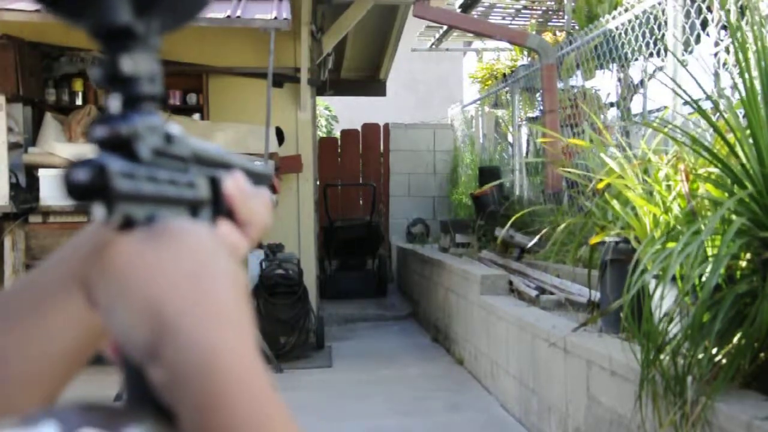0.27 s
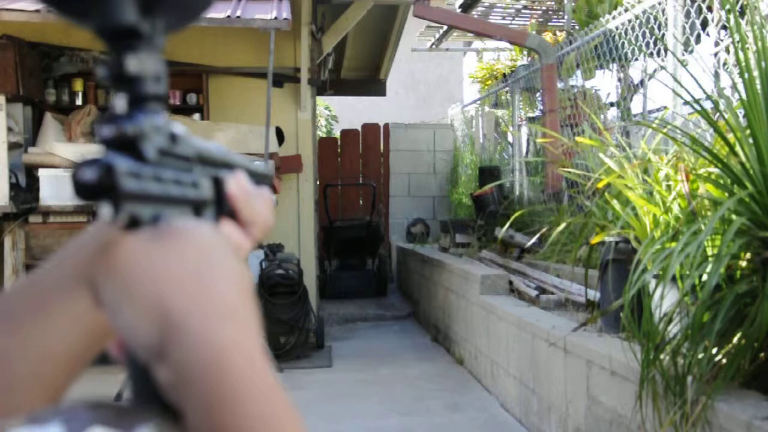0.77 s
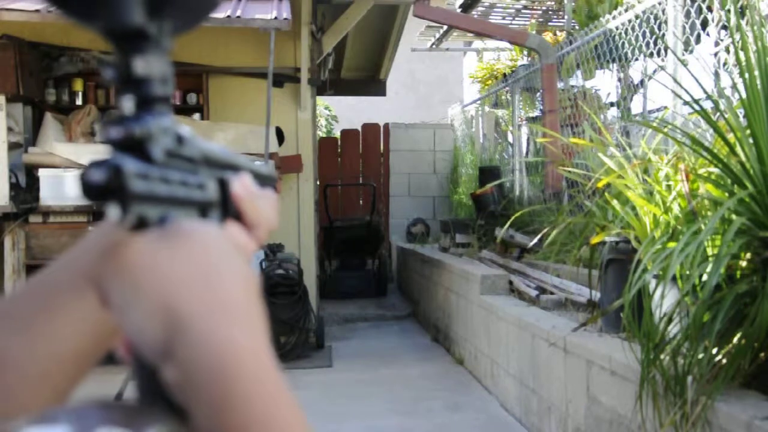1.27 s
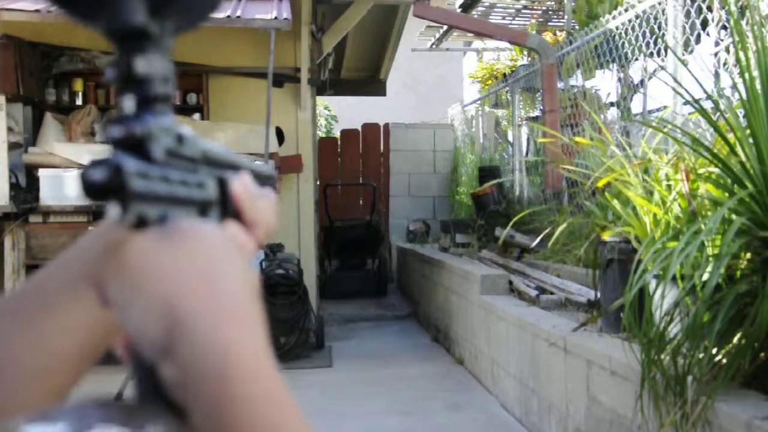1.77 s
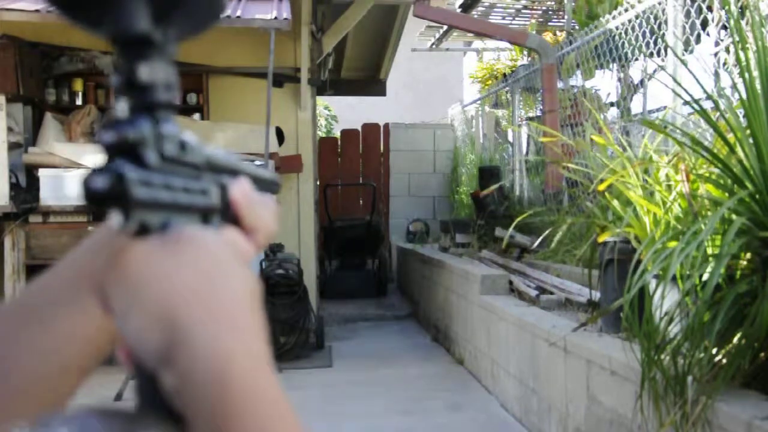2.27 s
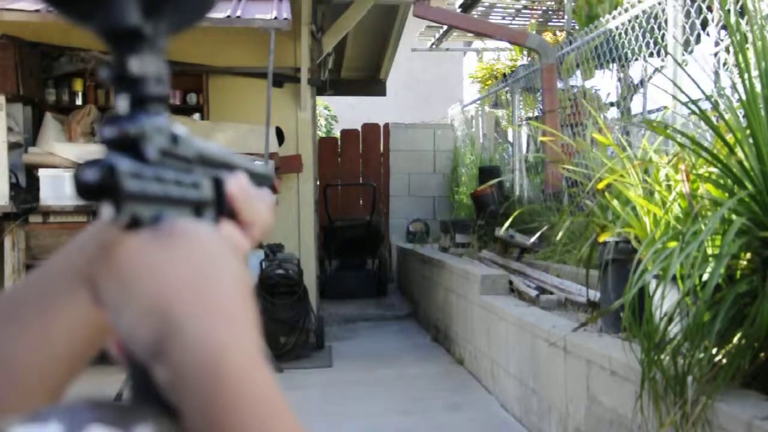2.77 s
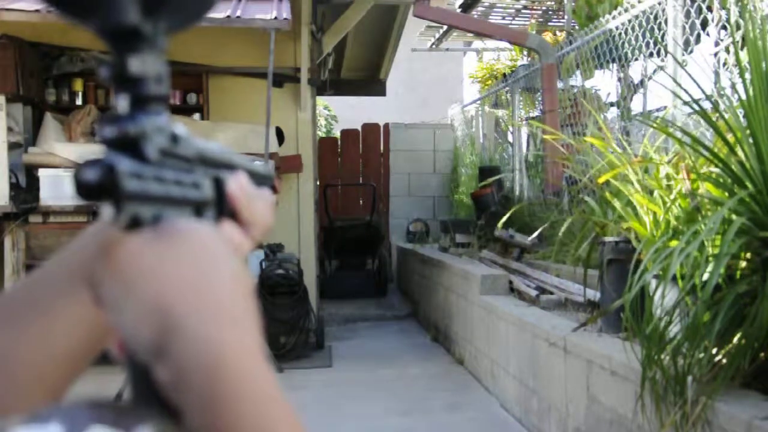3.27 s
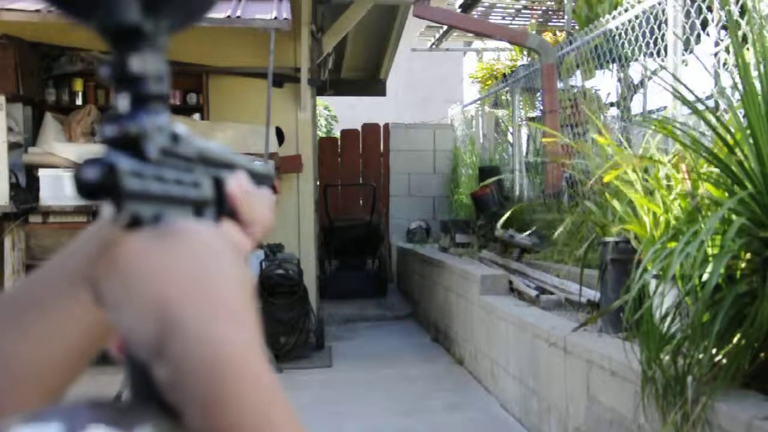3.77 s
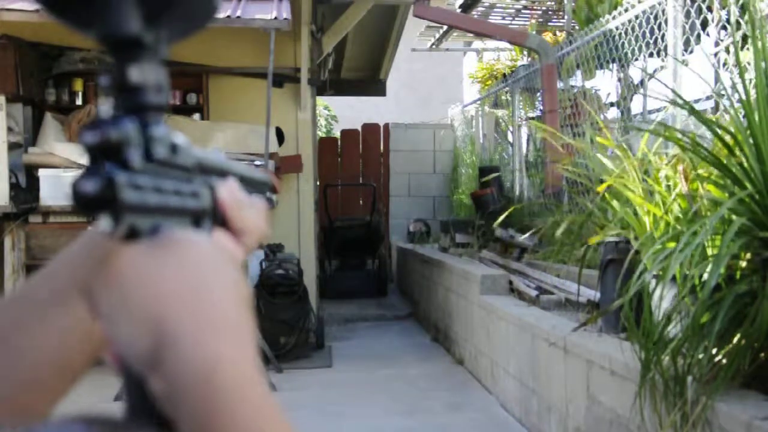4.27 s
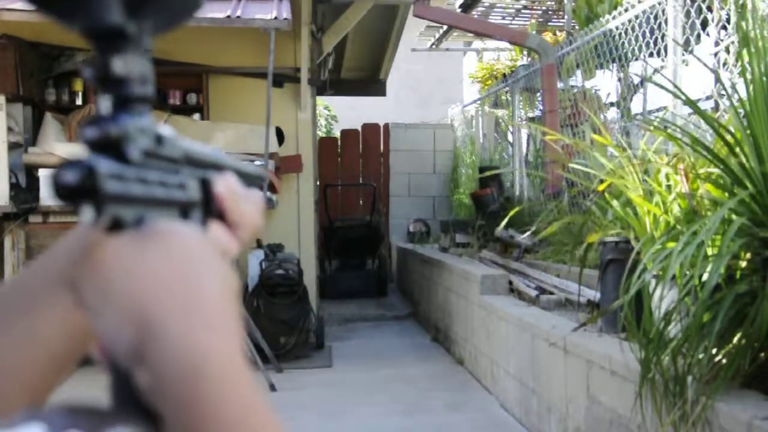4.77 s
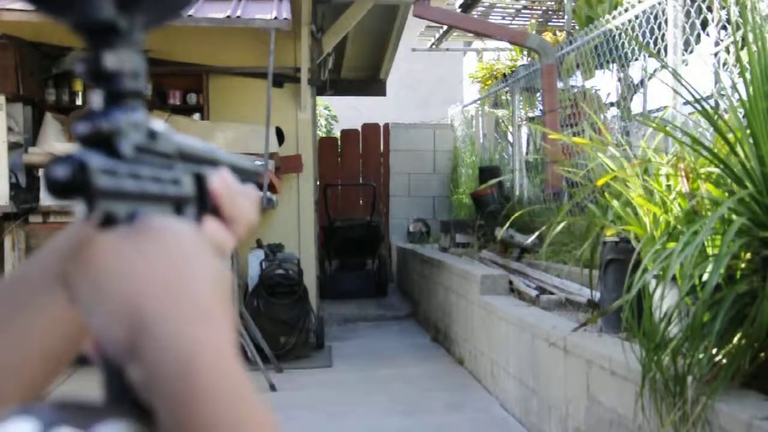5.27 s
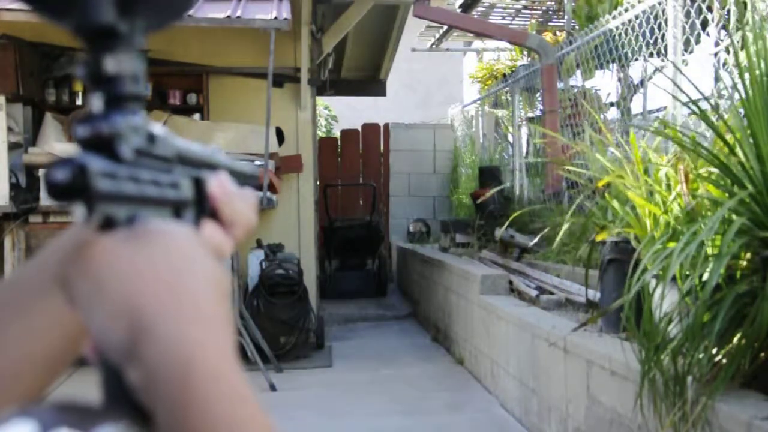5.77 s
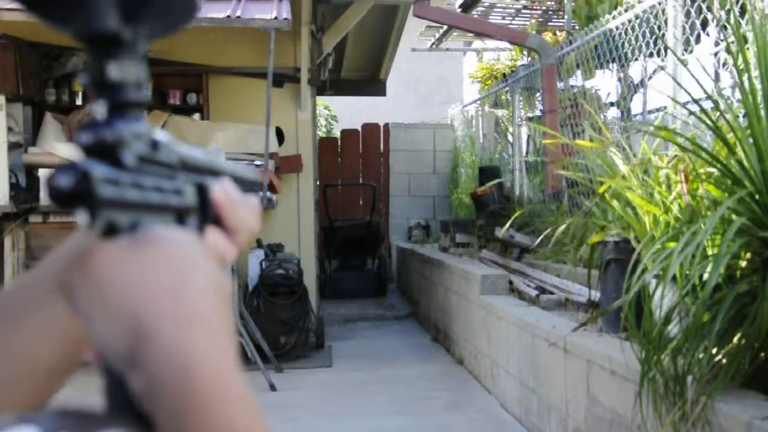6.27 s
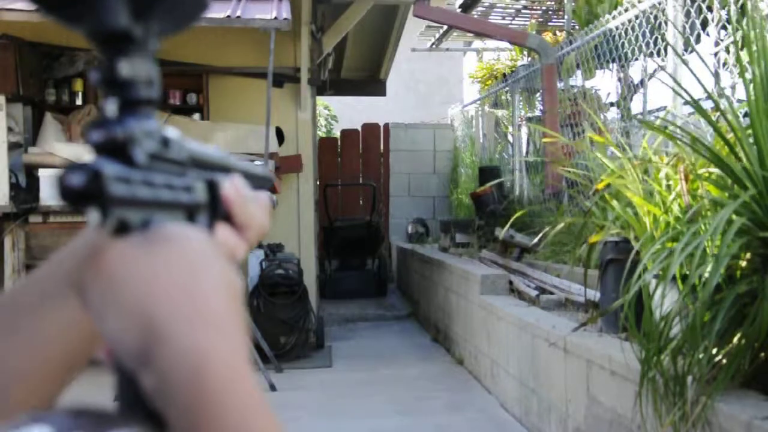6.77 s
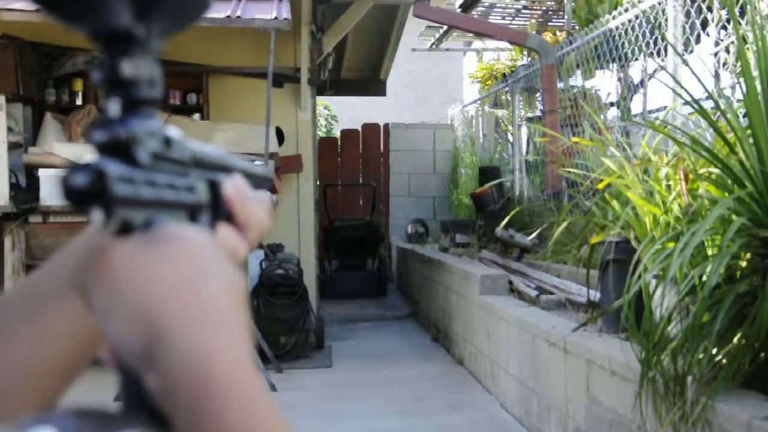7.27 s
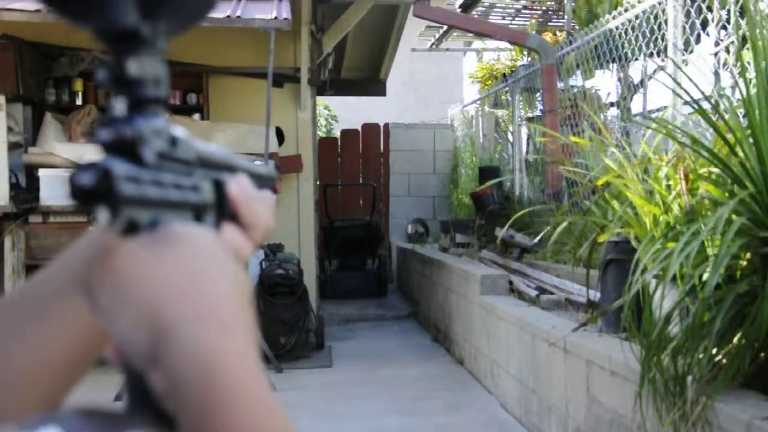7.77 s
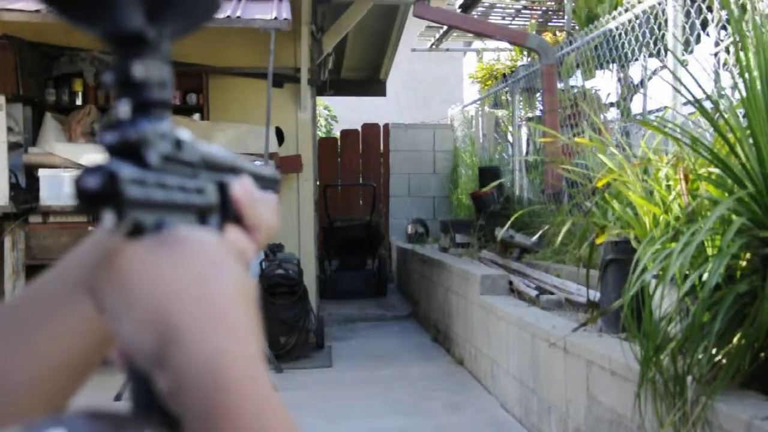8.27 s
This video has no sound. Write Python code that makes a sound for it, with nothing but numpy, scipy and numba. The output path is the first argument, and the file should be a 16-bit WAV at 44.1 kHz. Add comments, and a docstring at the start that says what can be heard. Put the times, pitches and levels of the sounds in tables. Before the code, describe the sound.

A pump paintball gun fires four sharp air blasts right beside the microphone, about two seconds apart, in a narrow walled yard. Each ball smacks a target a split second later, and the walls give a short echo. Between shots the pump clacks back and forward. Wind thumps and rumbles on the microphone throughout, over distant traffic and a few faint chirps. The shots distort slightly.

```python
"""A narrow walled back yard: a pump paintball marker fires four air blasts beside the microphone.
Each ball smacks a target at the far end about 113 ms later; the pump then clacks back and forward.
The walls echo. Wind eddies buffet the microphone throughout, over distant traffic and faint chirps.
The channel is dull, a limiter ducks after hard hits, and the shots overload the input."""
import sys
import numpy as np
from scipy import signal
from scipy.fft import rfft, irfft, next_fast_len
from scipy.io import wavfile
from numba import njit

SR = 44100
rng = np.random.default_rng(int(sys.argv[2]) if len(sys.argv) > 2 else 0)


def int16_out(signal):
    """Quantize to a 16-bit WAV file."""
    q = np.round(np.clip(np.atleast_2d(signal).T, -1, 1) * 32767)
    wavfile.write(sys.argv[1], SR, q.astype(np.int16))


N = 376173
T = np.arange(N) / SR
AGE = T[:SR * 3 // 4]  # time since an event's onset [s]


def undb(db):
    """Decibels to gain."""
    return 10 ** (np.asarray(db) / 20)


def unit(x):
    """Scale to rms 1."""
    return x / np.sqrt(np.mean(x ** 2))


def at_hz(table, hz, column=1):
    """Interpolate a table column over log frequency."""
    table = np.array(table, float)
    return np.interp(np.log(hz + 1e-9), np.log(table[:, 0]), table[:, column])


def colour(x, spectrum):
    """Minimum-phase filter with the given spectrum."""
    size = next_fast_len(len(x) + 4096)
    hz = np.linspace(0, SR / 2, 2049)
    cepstrum = irfft(np.log(undb(at_hz(spectrum, hz))))
    fold = 1 + np.sign(np.fft.fftfreq(len(cepstrum)))
    impulse = irfft(np.exp(rfft(cepstrum * fold)))
    return irfft(rfft(x, size) * rfft(impulse, size), size)[:len(x)]


def bands(x, count=17):
    """Yield overlapping half-octave bands: (centre [Hz], signal)."""
    size = next_fast_len(len(x))
    octave, spectrum = np.log2(np.fft.rfftfreq(size, 1 / SR) + 1e-9), rfft(x, size)
    for hz in 25 * 2 ** (np.arange(count) / 2):
        triangle = np.maximum(1 - 2 * abs(octave - np.log2(hz)), 0)
        yield hz, irfft(spectrum * triangle, size)[:len(x)]


def wander(rate_hz):
    """Smooth random curve, rms 1."""
    points = rng.standard_normal(N // 10)
    return unit(np.interp(T * rate_hz, np.arange(len(points)), points))


def add(out, time_s, x):
    """Mix x in at time_s."""
    i = max(int(time_s * SR), 0)
    out[i:i + len(x)] += x[:max(len(out) - i, 0)]


def fade(t60_s):
    """Exponential decay."""
    return np.exp(-np.log(1000) * AGE / t60_s)


def burst(spectrum, t60_s):
    """Decaying coloured noise; starts near rms 1."""
    noise = colour(rng.standard_normal(len(AGE)) * fade(t60_s), spectrum)
    return noise * np.sqrt(np.sum(fade(t60_s) ** 2) / np.sum(noise ** 2))


def front(spectrum):
    """Steep pressure front: a coloured impulse, peak 1."""
    pulse = colour(1. * (AGE == 0), spectrum)
    return pulse / np.max(abs(pulse))


def ring(modes, detune=0.01):
    """Struck modes; level, polarity and pitch vary per blow."""
    out = 0
    for hz, db, t60_s in modes:
        jitter_db, polarity, offset = rng.standard_normal(3)
        tone = np.sin(2 * np.pi * hz * (1 + detune * offset) * AGE)
        out += undb(db + jitter_db) * np.sign(polarity) * fade(t60_s) * tone
    return out


# Town noise spectrum: (frequency [Hz], relative level [dB])
TOWN_SPECTRUM = [(25, -5), (100, -2), (200, -5.5), (400, -8), (750, -8.5), (1300, -14), (2200, -19.5),
                 (4000, -23.5), (5100, -25), (5700, -27.5)]
def town(level_db=-47):
    """Distant traffic and leaves, slowly swelling."""
    gain = undb(level_db + .5 * wander(0.27) + 0.13 * wander(13))
    return gain * unit(colour(rng.standard_normal(N), TOWN_SPECTRUM))


# Far chirps: (time [s], length [s], start [Hz], end [Hz], level [dB], rasp deviation [Hz])
CHIRPS = [(4.713, 0.075, 4370, 4820, -42.5, 129), (4.713, 0.037, 3500, 3670, -44.5, 108),
          (4.728, 0.085, 2566, 2600, -45, 129), (4.732, 0.065, 5200, 5820, -40.5, 353),
          (4.813, .06, 5000, 4900, -42.5, 130.4), (7.038, 0.042, 3400, 3810, -50.5, 900),
          (7.594, .05, 4260, 4910, -44, 780), (7.735, 0.12, 3750, 3970, -46, 400),
          (7.789, 0.12, 4420, 4300, -46.5, 201)]
def chirps():
    """Gliding whistles, roughened by fast pitch jitter."""
    out = np.zeros(N)
    for time_s, length_s, start_hz, end_hz, db, rasp_hz in CHIRPS:
        n = int(length_s * SR)
        hz = np.linspace(start_hz, end_hz, n) + rasp_hz * wander(900)[:n]
        add(out, time_s, undb(db) * np.sqrt(np.hanning(n)) * np.sin(2 * np.pi * np.cumsum(hz) / SR))
    return out


# Breeze between gusts: (time [s], level [dB])
BREEZE = [(0, -48), (.06, -24), (.7, -26.5), (.87, -46.5), (1.15, -30), (1.45, -34.5), (1.75, -66),
          (2.05, -59), (2.32, -35), (2.88, -30), (3.11, -40), (3.26, -27), (3.8, -37), (4.25, -28.5),
          (4.4, -46), (4.68, -39.5), (5.46, -32), (5.55, -48), (6.3, -28), (6.76, -25), (6.9, -39.5),
          (7.3, -31.5), (8.25, -34), (8.45, -48)]
# Swells of flow: (time [s], hold [s], level [dB]); all are gusts except the one at 1.574 s, the first shot's
# low pressure thump
SWELLS = [(0.122, 0.092, -16), (0.347, 0.05, -19), (0.463, 0.064, -9.5), (.595, 0.052, -21),
          (0.696, 0.13, -25), (0.916, 0.056, -24), (1.234, 0.092, -15.5), (1.574, 0.028, -18.5),
          (2.118, 0.081, -26), (2.397, 0.027, -23), (2.527, .21, -25), (2.798, 0.075, -21.5),
          (2.956, 0.065, -21.5), (3.185, 0.056, -18), (3.302, .12, -18.5), (3.476, 0.14, -19.5),
          (3.865, 0.12, -24), (4.06, 0.098, -29.5), (4.534, 0.17, -30.5), (4.738, 0.055, -21.5),
          (5.036, 0.05, -26.5), (5.123, 0.038, -23), (5.313, .11, -25.5), (5.902, 0.032, -14),
          (6.416, 0.052, -18), (6.483, 0.054, -11.5), (6.549, 0.069, -20), (7.027, 0.12, -36),
          (7.413, 0.15, -23.5), (7.598, 0.029, -17), (7.834, 0.014, -22), (8.138, 0.12, -23.5)]
def airflow(attack_s=0.026, release_s=0.013):
    """Flow strength at the microphone: gusts, and the first shot's low thump, swell, hold and drop back to the
    breeze."""
    flow = undb(np.interp(T, *np.transpose(BREEZE)))
    for time_s, hold_s, db in SWELLS:
        shape = np.interp(AGE, np.cumsum([0, attack_s, hold_s, release_s]), [0, 1, 1, 0])
        add(flow, time_s - attack_s, undb(db) * shape ** 2)
    return flow


# Turbulence spectrum: (frequency [Hz], relative level [dB])
WIND_SPECTRUM = [(20, -21.5), (50, -7), (110, 2.5), (200, 3), (320, -3), (500, -10), (750, -20.5),
                 (1100, -33), (1800, -50), (4000, -62)]
def wind(flow, gain_db=-3, brighten=0.58, flutter_db=4, flicker_db=1.8, patchy_db=5,
         breeze_db=-20, ceiling_db=-11, puff_db_per_oct=4):
    """Turbulence on the microphone port: stronger gusts shed smaller eddies and sound brighter."""
    flutter = unit(undb(flutter_db * np.tanh(wander(110) / 2) * 2))
    patches = undb(patchy_db * np.tanh(wander(38)) / (1 + flow / undb(breeze_db)))  # mainly in light air
    gust = flow * flutter * patches
    gust_db = ceiling_db + 20 * np.log10(np.tanh(gust / undb(ceiling_db)))
    tilt_db_per_oct = brighten * (gust_db - breeze_db) + puff_db_per_oct * np.tanh(wander(140))
    turbulence = unit(colour(rng.standard_normal(N), WIND_SPECTRUM))
    out = 0
    for hz, band in bands(turbulence, count=15):
        octaves = np.clip(np.log2(hz / 230), -.5, 1.8)
        out += band * undb(gust_db + tilt_db_per_oct * octaves + flicker_db * wander(25))
    return undb(gain_db) * out


def small_eddies(flow, count=260, over_db=8, scatter_db=3, max_db=-7,
                 centre_hz=260, ref_db=-22, oct_per_db=-0.0042, scatter_oct=.22):
    """Eddies shed at uneven times, harder in stronger flow; rows as in HARD_EDDIES."""
    times_s = (np.arange(count) + rng.random(count)) * T[-1] / count
    flow_db = 20 * np.log10(np.interp(times_s, T, flow))
    strength, pitch = np.clip(rng.standard_normal((count, 2)), -2, 2).T
    db = np.minimum(flow_db + over_db + scatter_db * strength, max_db)
    hz = centre_hz * 2 ** (oct_per_db * (flow_db - ref_db) + scatter_oct * pitch)
    return list(zip(times_s, db, hz))


# Hardest eddies: (time [s], level [dB], centre [Hz])
HARD_EDDIES = [(.132, -5.5, 380), (.158, 0, 360), (.358, -3, 390), (.391, -1, 338), (.461, 4, 280),
               (.482, 7.5, 480), (.61, -5, 180), (.723, -8, 190), (.785, -7.5, 250), (.931, -7.5, 250),
               (1.201, -9.5, 270), (1.258, -10, 294), (2.403, -11.5, 250), (2.634, -7, 232),
               (2.713, -8, 270), (2.832, -5, 197), (2.966, -4.5, 200), (3.009, 0.5, 290), (3.044, 0.5, 320),
               (3.081, -11, 320), (3.217, -1, 284), (3.296, -5, 343), (3.387, -1.5, 337), (3.518, -3, 304),
               (3.607, -5.5, 308), (3.637, -2.5, 290), (4.79, -8.5, 222), (4.894, -10, 270),
               (5.031, -5.5, 225), (5.135, -12, 220), (5.338, -6, 374), (5.408, -8, 257), (5.648, -14, 209),
               (6.495, -1.5, 398), (6.607, -6.5, 270), (7.133, -13.5, 260), (7.308, -10.5, 230),
               (7.444, -6.5, 327), (7.506, -12.5, 293), (7.596, -6, 250), (7.621, -1.5, 318),
               (7.835, -6, 230), (8.023, -11, 167), (8.208, -0.5, 294)]
def buffets(flow, width_cycles=0.57, snap_db=-21, snap_growth=0.19, crackle_db=-46):
    """Each eddy thumps the microphone with a brief pressure swing; harder ones snap and crackle more."""
    out, t = np.zeros(N), AGE[:SR // 20] - 1 / 40
    for time_s, db, hz in small_eddies(flow) + HARD_EDDIES:
        phase = rng.random()
        swing = np.cos(2 * np.pi * (hz * t + phase)) / np.cosh(2 * hz * t / width_cycles)
        snap = np.cos(2 * np.pi * (2.5 * hz * t + phase)) / np.cosh(7 * hz * t)
        crackle = undb(crackle_db + db) * swing ** 2 * rng.standard_normal(len(t))
        add(out, time_s + t[0], undb(db) * (swing + undb(snap_db + snap_growth * db) * snap + crackle))
    return out


# Yard reverberation: (frequency [Hz], early level [dB], late level [dB], late t60 [s])
YARD_REVERB = [(60, -17.5, -26, .5), (250, 7.5, -16.5, 0.24), (500, 2.5, -13.5, 0.36),
               (1000, 8.5, -10, 0.81), (2000, 2.5, -16.5, 0.54), (3500, 4.5, -17, 0.51),
               (5500, 1.5, -19, 0.96)]
def yard(send, early_t60_s, gap_s=0.0055, build_s=0.0055, lumpy_db=3):
    """Echoes of send: close walls answer densely at once, surrounding houses ring on."""
    reflections = rng.standard_normal(len(AGE)) * unit(undb(lumpy_db * wander(1500)[:len(AGE)]))
    tail = 0
    for hz, band in bands(reflections):
        early_db, late_db, late_t60_s = (at_hz(YARD_REVERB, hz, column) for column in (1, 2, 3))
        tail += band * (undb(early_db) * fade(early_t60_s) + undb(late_db) * fade(late_t60_s))
    onset = np.clip((AGE - gap_s) / build_s, 0, 1)
    impulse = tail * onset / np.sqrt(np.sum(fade(early_t60_s) ** 2))
    return signal.fftconvolve(send, impulse)[:N]


# Metal contact spectrum: (frequency [Hz], relative level [dB])
TICK_SPECTRUM = [(100, -19), (500, -5.5), (1000, 2), (1500, -1.5), (2400, 2), (3600, 2.5), (5500, 0)]
# Body, grip and bolt modes: (frequency [Hz], level [dB], t60 [s])
BODY_MODES = [(709, 4, 0.025), (957, 0.5, .04), (1177, 1, 0.026), (1793, 1, 0.024), (2293, -7, 0.039),
              (2680, -21.5, 0.026), (3200, -18, .018), (3710, 9.5, 0.011)]
GRIP_MODES = [(553, 4, 0.04), (655, 4, 0.039), (1210, -7, .05)]
BOLT_MODES = [(4510, 2.6, 0.01), (4900, 0.51, 0.018)]
# Pump clacks: (time [s], level [dB], grip trim [dB], bolt trim [dB])
CLACKS = [(2.0063, 1.5, -40, 1.5), (2.0366, -8.5, -18, 8), (2.056, -9.5, 5, 5.5), (2.2053, 0, -6, 0.5),
          (2.3062, -9.5, 10, -1.5), (4.1708, -2.5, -14, -26), (4.1771, -8, -2, 8.5),
          (4.2520, -8, -24, 15.5), (4.2620, 0, 4, -12), (4.4305, 1, -33, 6.5), (4.537, -13, 7, -15),
          (6.3862, 2, -7, 5.5), (6.4322, -5.5, -6, 9), (6.4520, -9, 13, 7.5), (6.6210, 1, -25, 9.5),
          (6.7305, -16.5, 10.5, -6)]
def pump(tick_db=-10, rattle_db=-20, body_db=-25, grip_db=-23, bolt_db=-21,
         scrape_lead_s=0.001623, scrape_db=-21, send_db=-4):
    """Metal parts scrape into their stops, tick, rattle and ring. Returns (direct, yard send)."""
    out, send = np.zeros((2, N))
    pulse = front(TICK_SPECTRUM)
    for time_s, db, grip_trim_db, bolt_trim_db in CLACKS:
        tick = undb(tick_db) * burst(TICK_SPECTRUM, t60_s=0.012)
        rattle = undb(rattle_db) * burst(TICK_SPECTRUM, t60_s=0.096)
        body = undb(body_db) * ring(BODY_MODES)
        grip = undb(grip_db + grip_trim_db) * ring(GRIP_MODES)
        bolt = undb(bolt_db + bolt_trim_db) * ring(BOLT_MODES, detune=0.041)
        add(out, time_s - scrape_lead_s, undb(db + scrape_db) * burst(TICK_SPECTRUM, t60_s=0.045))
        add(out, time_s, undb(db) * (tick + rattle + body + grip + bolt))
        add(send, time_s, undb(db + send_db) * pulse)
    return out, send


# Bursting shell spectrum: (frequency [Hz], relative level [dB])
SPLAT_SPECTRUM = [(100, -16), (350, -13.5), (650, -2), (1200, -6), (2200, -1.5), (3600, -6), (5500, -17)]
# Target modes: (frequency [Hz], level [dB], t60 [s])
TARGET_MODES = [(596, 3, 0.052), (850, 0, 0.079), (1538, 4.5, 0.041), (2263, 6.5, 0.04), (2210, -36, .035),
                (3100, -15, .05), (4570, -1, 0.031)]
# Ball impacts: (time [s], splat trim [dB], target trim [dB])
HITS = [(1.7, -1.5, -2.5), (3.7616, -1, -4.5), (6.0403, -2.5, -34.5), (8.3407, 0.5, 3)]
def ball_hits(splat_db=-10, target_db=-11, send_db=11):
    """The shell bursts and the target rings. Returns (direct, yard send)."""
    out, send = np.zeros((2, N))
    for time_s, splat_trim_db, target_trim_db in HITS:
        splat = undb(splat_db + splat_trim_db) * burst(SPLAT_SPECTRUM, t60_s=0.1)
        target = undb(target_db + target_trim_db) * ring(TARGET_MODES)
        add(out, time_s, splat + target)
        add(send, time_s, undb(send_db + splat_trim_db) * front(SPLAT_SPECTRUM))
    return out, send


# Muzzle blast spectrum: (frequency [Hz], relative level [dB])
BLAST_SPECTRUM = [(40, -17.5), (120, -2.5), (260, 13), (420, 6.5), (700, 2.5), (1500, 5), (2400, 1),
                  (4000, 0), (5500, -2)]
# Barrel modes: (frequency [Hz], level [dB], t60 [s])
BARREL_MODES = [(270, -4, 0.025), (634, 5, 0.067), (943, -4.5, 0.019), (1747, -23, .03), (3160, -4, 0.051)]
# Shots: (time [s], level [dB], barrel trim [dB])
SHOTS = [(1.584, 2.5, 1), (3.6495, 0.5, -10), (5.9242, 0.5, 5.5), (8.2275, 3.5, 2)]
def shots(sear_lead_s=.0058, sear_db=-29, front_db=15, blast_db=-1, vent_db=-11, barrel_db=-13,
          bounce_s=0.0038, bounce_db=-4, send_db=17):
    """The hammer trips, air dumps down the barrel, spare air vents. Returns (direct, yard send)."""
    out, send = np.zeros((2, N))
    pulse = front(BLAST_SPECTRUM)
    for time_s, db, barrel_trim_db in SHOTS:
        blast = undb(front_db) * pulse + undb(blast_db) * burst(BLAST_SPECTRUM, t60_s=0.073)
        vent = undb(vent_db) * burst(BLAST_SPECTRUM, t60_s=0.082)
        sear = undb(sear_db) * burst(TICK_SPECTRUM, t60_s=0.021)
        barrel = undb(barrel_db + barrel_trim_db) * ring(BARREL_MODES)
        paving_bounce = undb(db + bounce_db) * burst(BLAST_SPECTRUM, t60_s=0.0094)
        add(out, time_s - sear_lead_s, sear)
        add(out, time_s, undb(db) * (blast + vent + barrel))
        add(out, time_s + bounce_s, paving_bounce)
        add(send, time_s, undb(db + send_db) * pulse)
    return out, send


def scene(wet_db=-15, chirp_wet_db=2):
    """Mono mix: near sounds bounce between the side walls, far ones mostly off the yard's end."""
    pop, pop_send = shots()
    smack, smack_send = ball_hits()
    clack, clack_send = pump()
    chirp = chirps()
    near = yard(pop_send + clack_send + undb(wet_db) * (pop + clack), early_t60_s=0.22)
    far = yard(smack_send + undb(wet_db) * smack + undb(chirp_wet_db) * chirp, early_t60_s=0.037)
    flow = airflow()
    background = town() + chirp + wind(flow) + buffets(flow)
    return (background + near + far + clack + smack + pop)[None]


@njit
def follow(x, attack_s, release_s):
    """One-pole envelope follower."""
    out, level = np.empty(len(x)), 0.
    for i in range(len(x)):
        tau_s = attack_s if abs(x[i]) > level else release_s
        level += (abs(x[i]) - level) / (tau_s * SR)
        out[i] = level
    return out


# Microphone and limiter sidechain responses: (frequency [Hz], gain [dB])
MIC_RESPONSE = [(20, -1), (60, 1.5), (4800, -1), (5300, -4.5), (5800, -15.5), (6200, -31), (6600, -65.5),
                (8000, -83)]
SIDECHAIN_RESPONSE = [(20, 8.5), (330, 4.5), (900, 4.5), (5000, -10.5)]
def record(dry, knee_db=-4, attack_s=0.0027, release_s=0.26, clip_level=.72, cutoff_hz=16300):
    """Dull microphone, bass-sensitive limiter, and an input stage that flattens the shots' peaks."""
    mic = colour(dry[0], MIC_RESPONSE)
    load = follow(colour(mic, SIDECHAIN_RESPONSE), attack_s, release_s) / undb(knee_db)
    ducked = mic / (1 + load ** 4) ** (1 / 4)
    clipped = ducked / (1 + (ducked / clip_level) ** 20) ** (1 / 20)
    lowpass = signal.ellip(8, .2, 70, cutoff_hz, fs=SR, output="sos")
    return signal.sosfilt(lowpass, clipped)[None]


dry = scene()
out = record(dry)
int16_out(out)
```